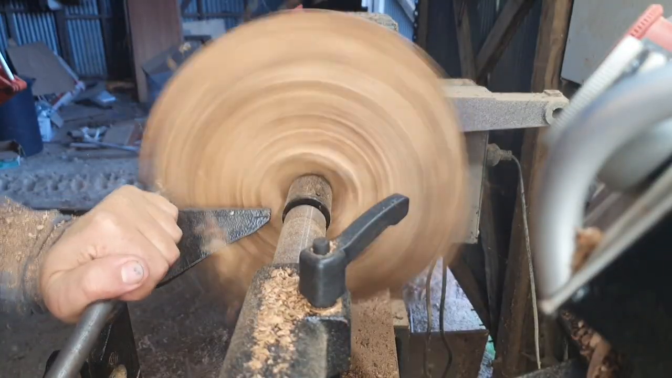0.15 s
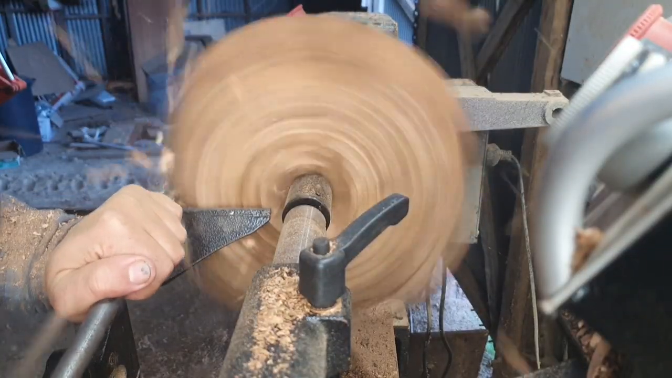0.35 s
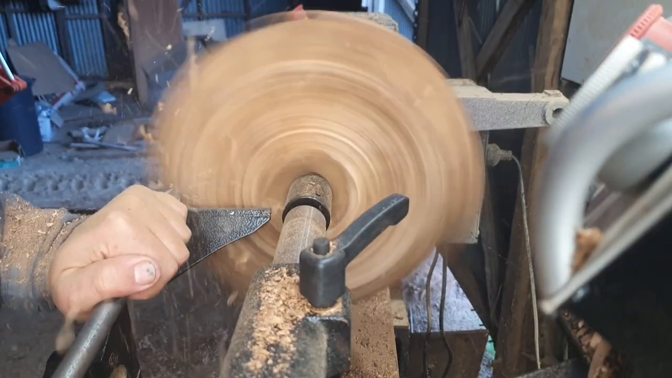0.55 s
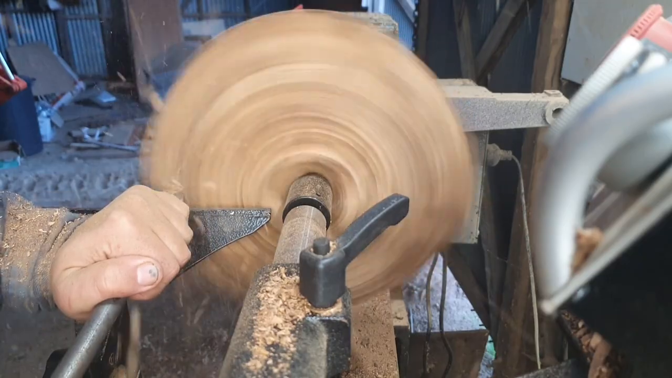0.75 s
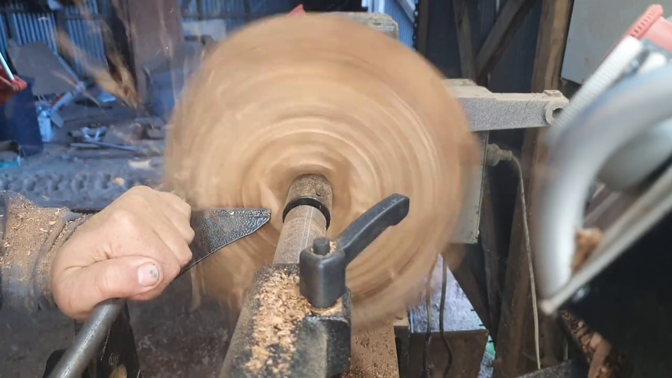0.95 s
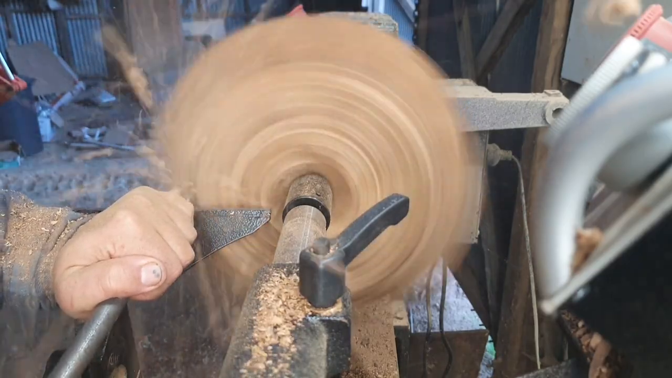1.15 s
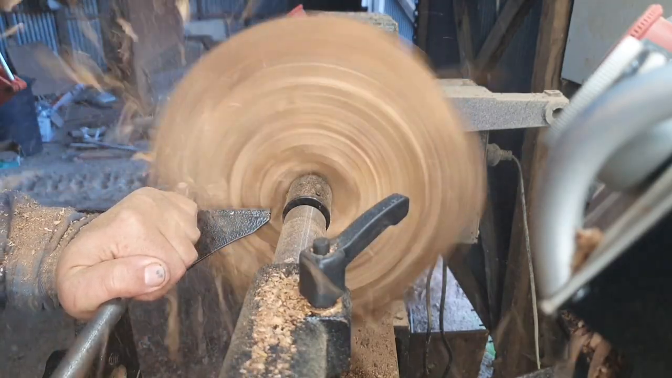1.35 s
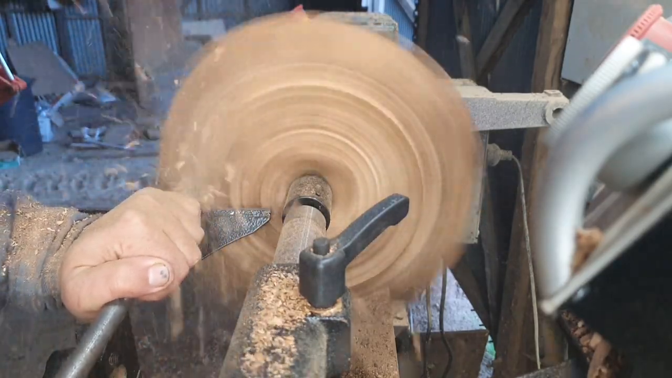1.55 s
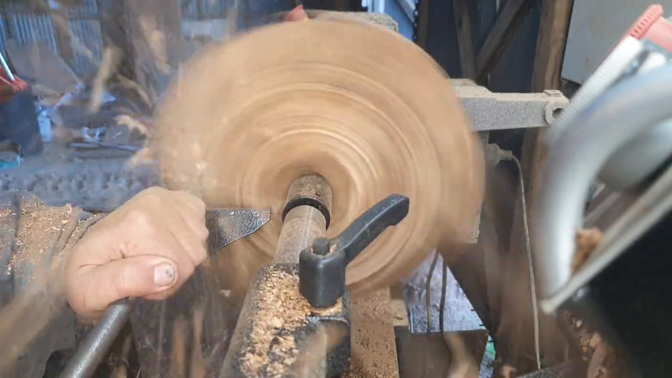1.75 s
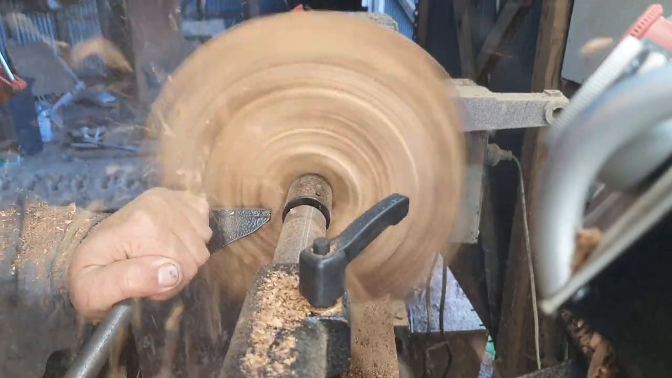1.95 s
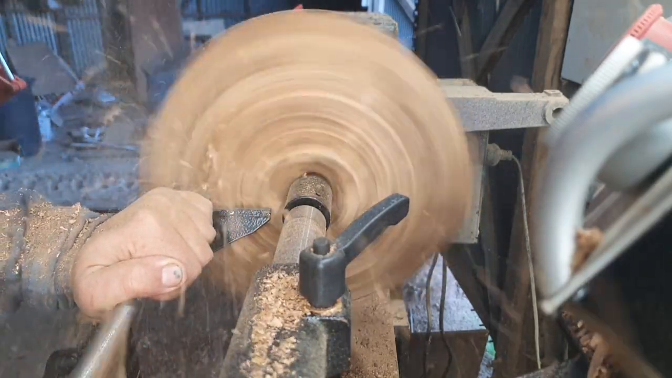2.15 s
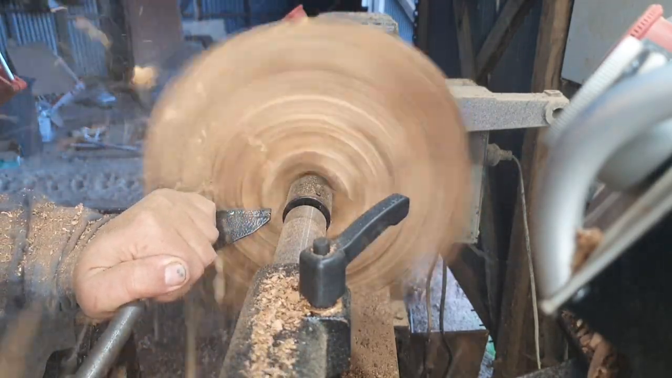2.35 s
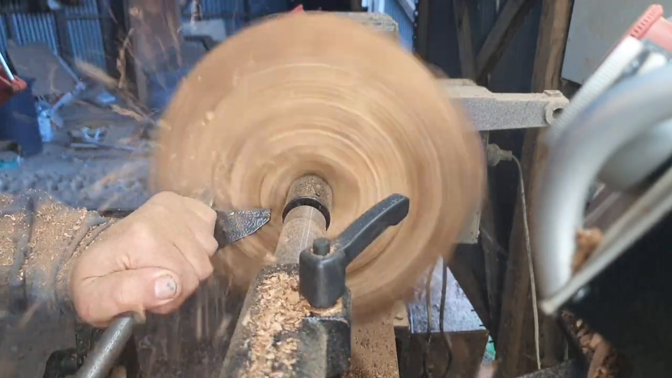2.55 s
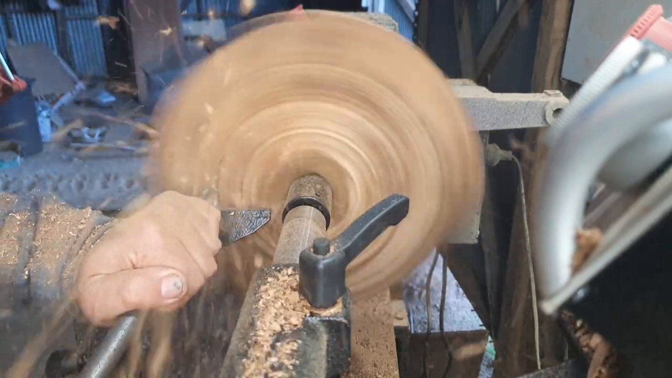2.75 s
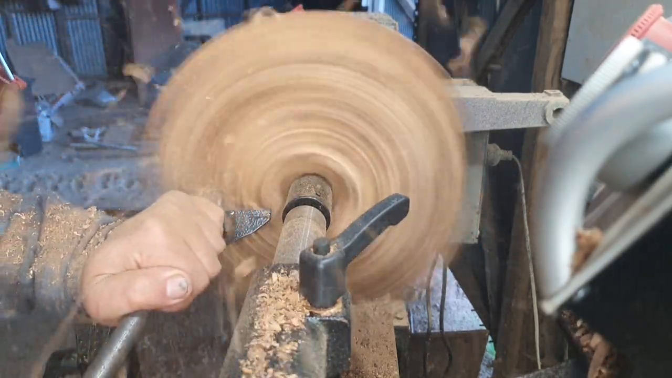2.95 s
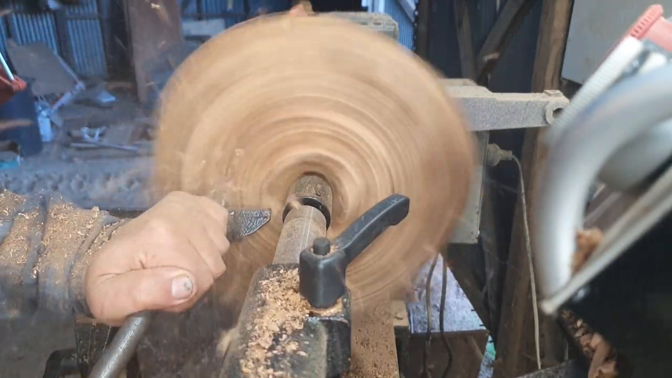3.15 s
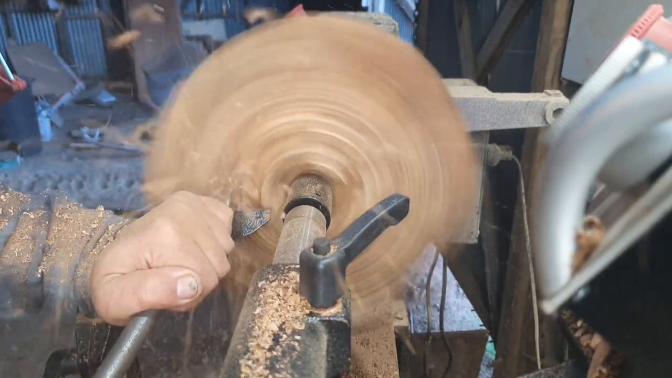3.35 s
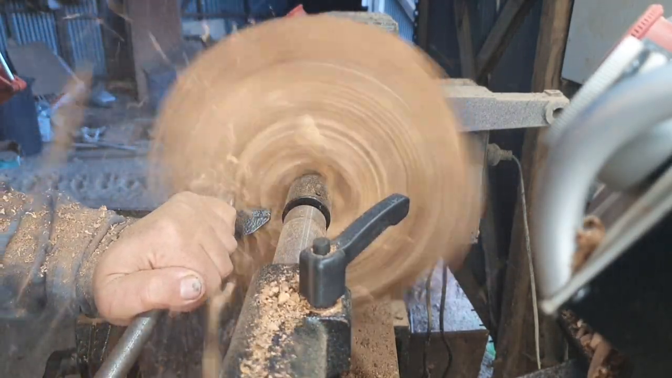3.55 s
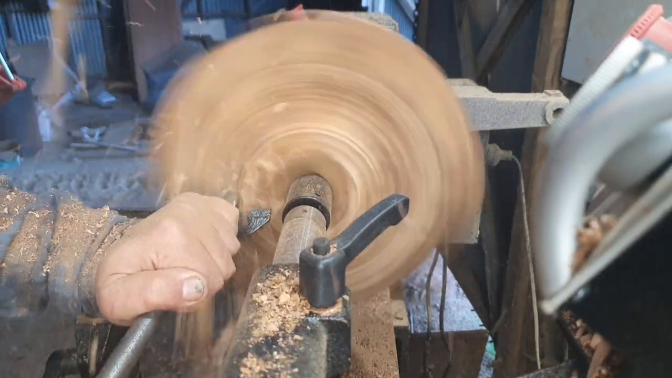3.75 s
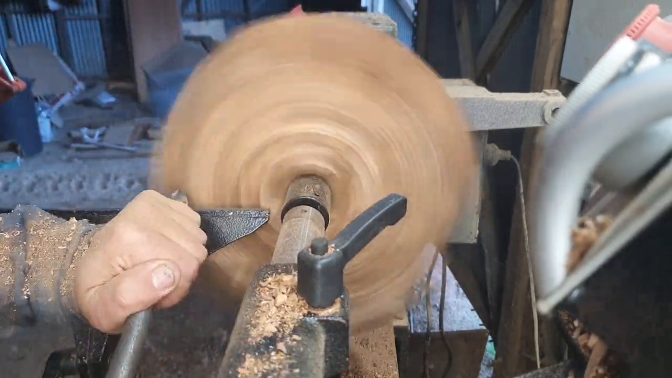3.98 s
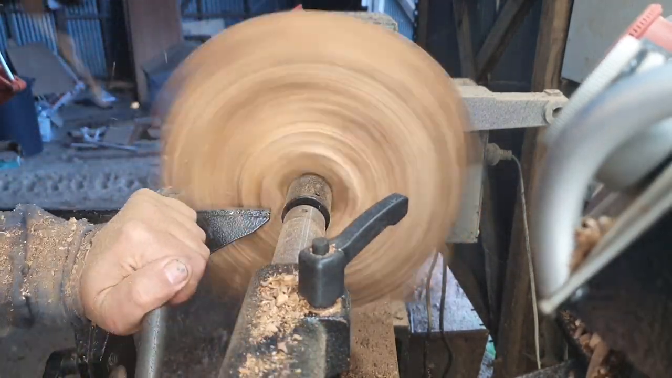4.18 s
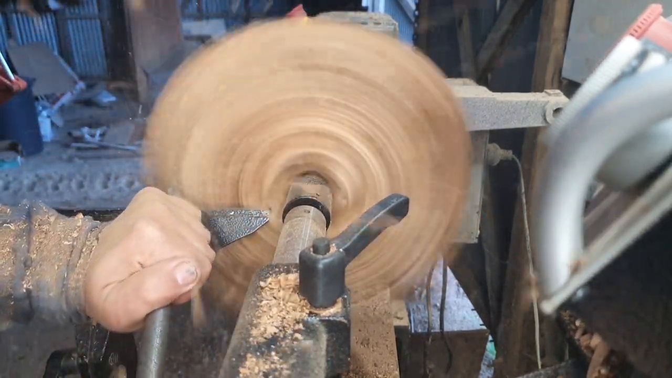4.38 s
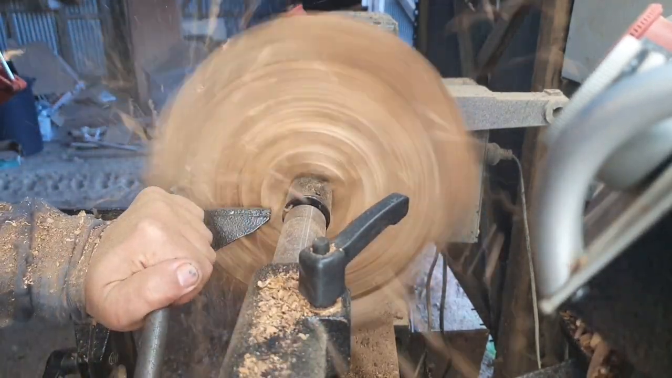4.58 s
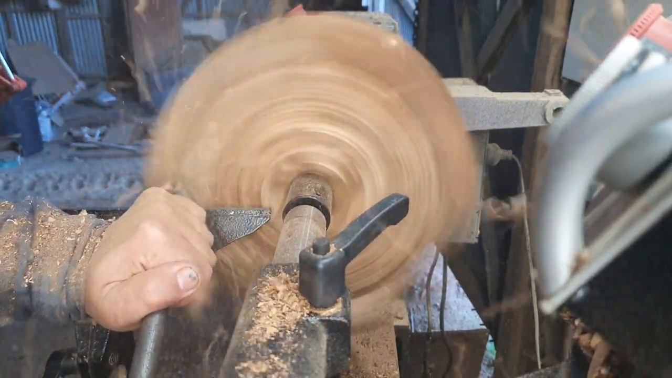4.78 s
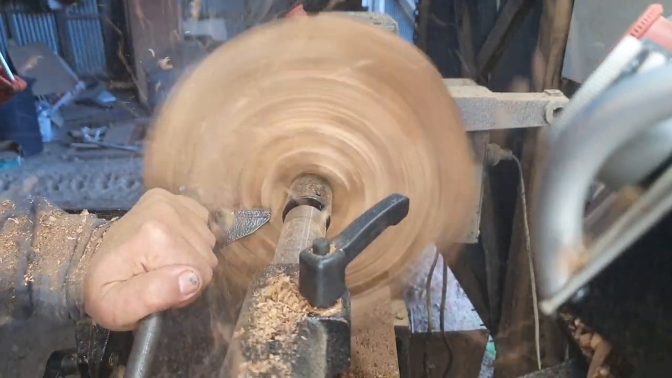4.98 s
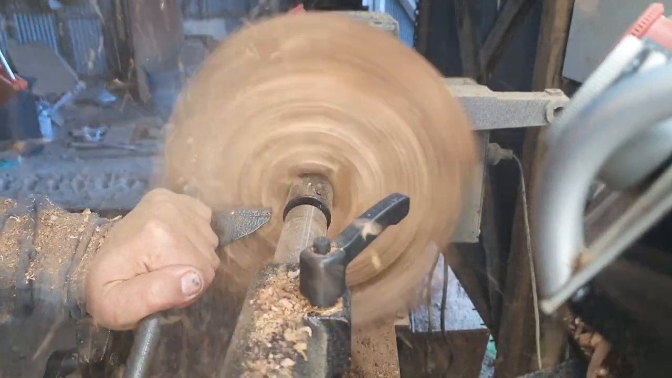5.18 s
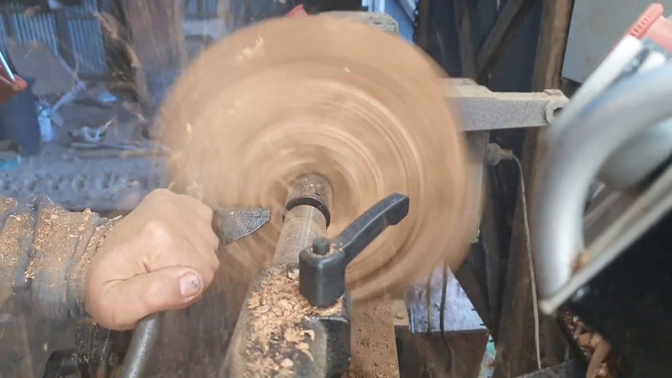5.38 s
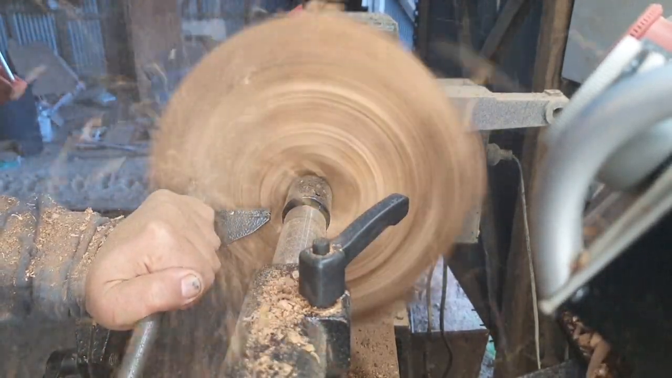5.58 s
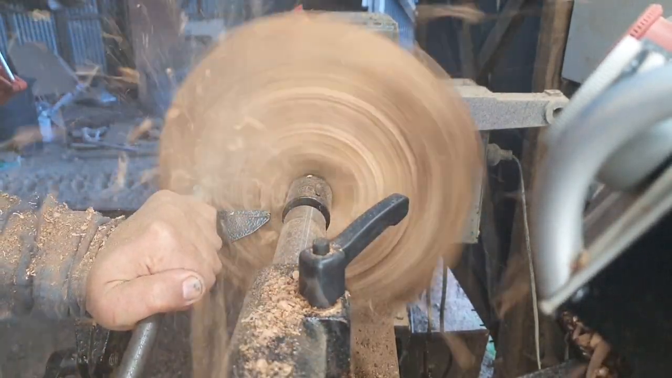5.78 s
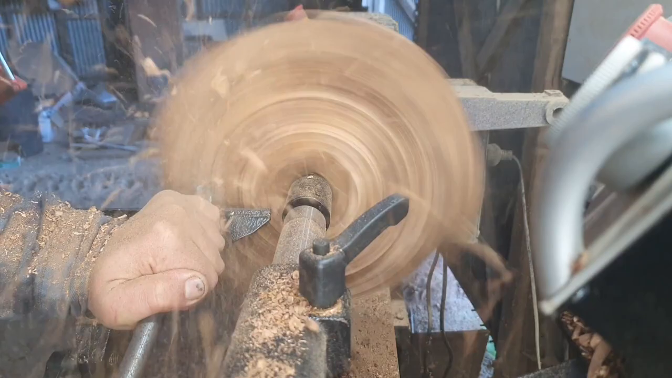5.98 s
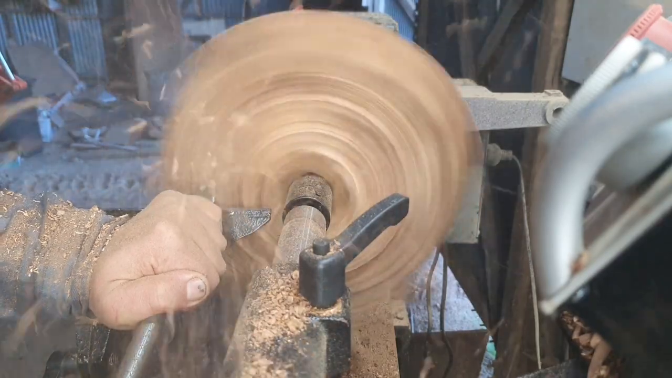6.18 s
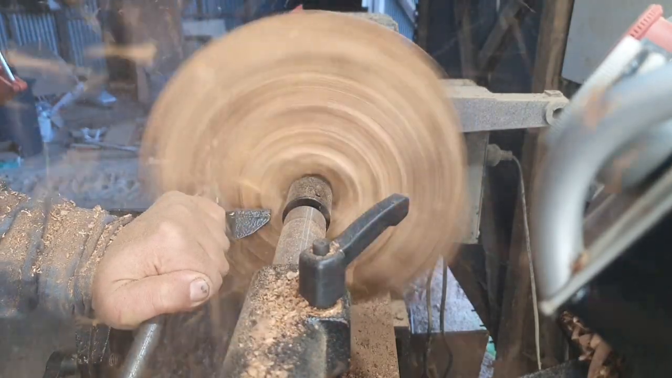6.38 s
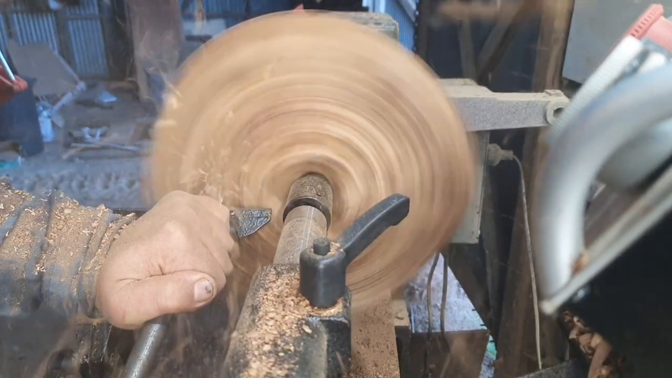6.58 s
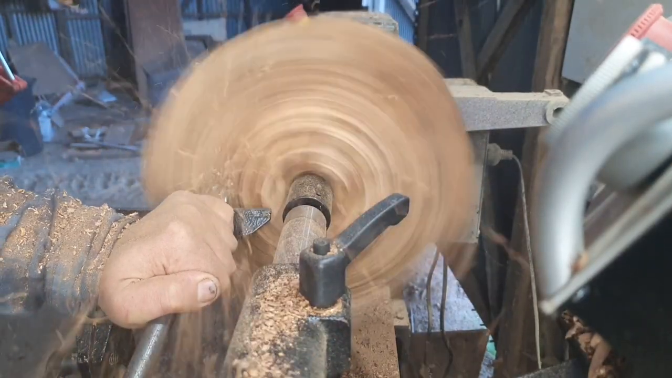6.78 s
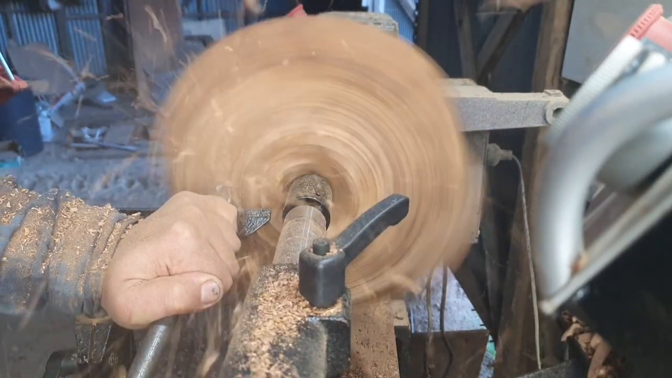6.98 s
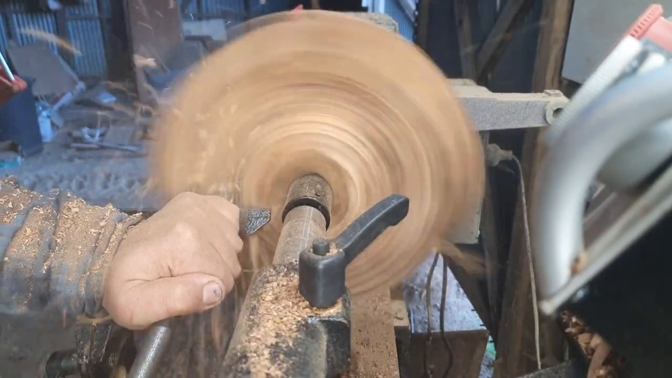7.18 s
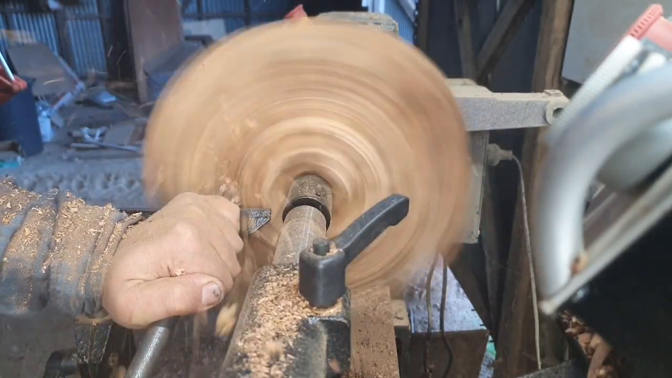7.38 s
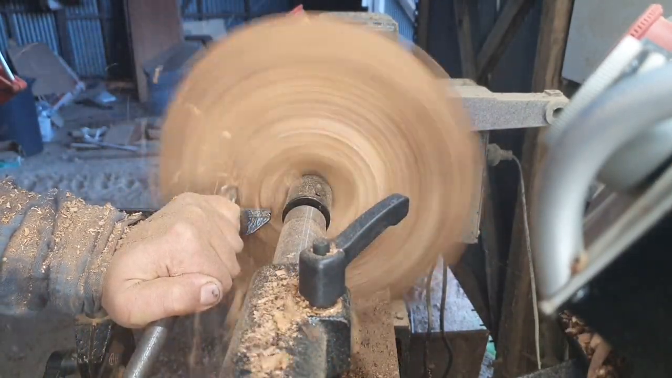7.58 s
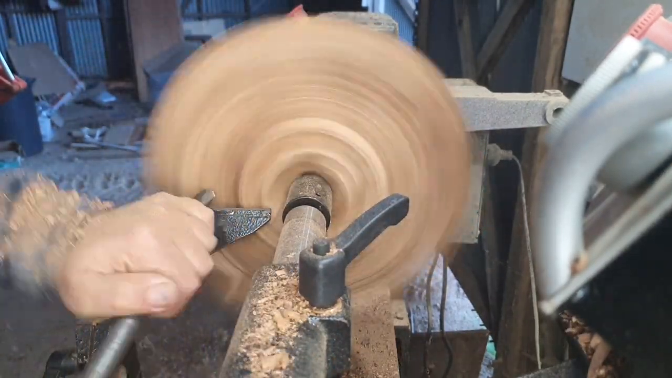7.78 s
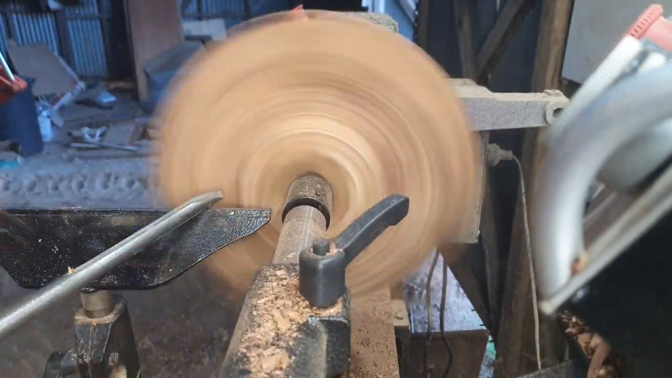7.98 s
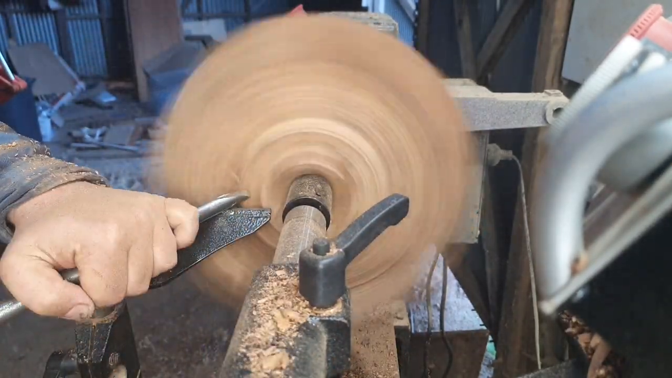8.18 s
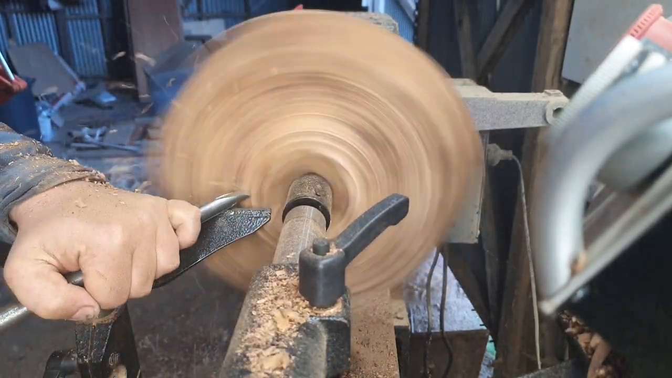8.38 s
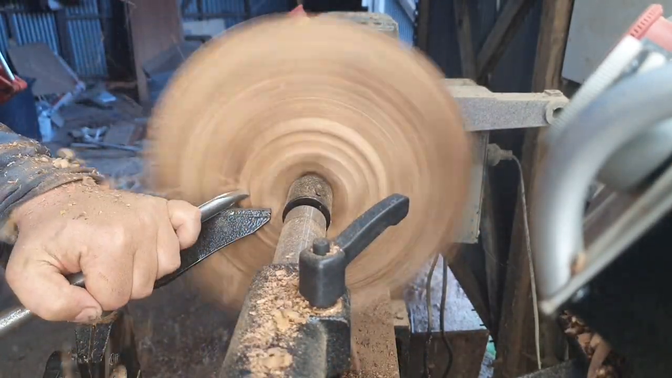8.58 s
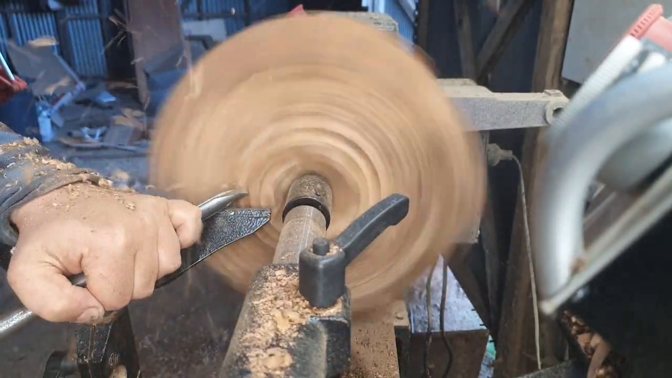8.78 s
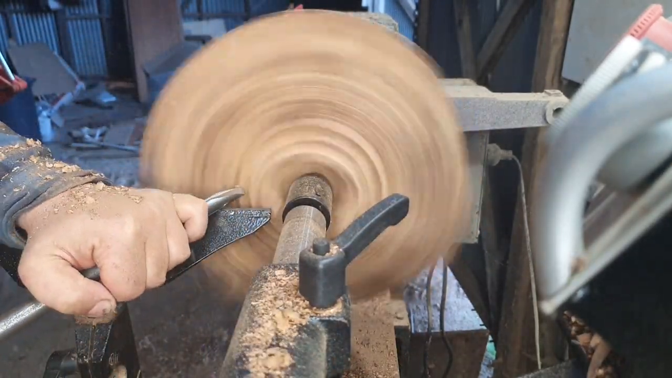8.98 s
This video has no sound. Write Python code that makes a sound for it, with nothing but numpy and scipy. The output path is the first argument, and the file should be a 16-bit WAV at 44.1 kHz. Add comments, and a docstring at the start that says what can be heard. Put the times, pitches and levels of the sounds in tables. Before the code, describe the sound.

A gouge cuts spinning wood on a lathe in three passes, with a rough, fluttering scrape and hiss, sharp crunches and two short pauses.

```python
"""A gouge roughs the outside of a bowl blank on a lathe, in three passes, heard from close by.
The uneven wood comes round about 31 times a second and modulates the depth of cut: its bumps drive
the modes of the blank, its fibres fracture in bursts, and the fractures set the steel ringing.
High spots catch the edge with a crunch. Between the passes the lathe whirs quietly in a dry workshop,
and a hand slides once along the tool."""
import sys
import numpy as np
from scipy import signal
from scipy.fft import rfft, irfft, next_fast_len
from scipy.io import wavfile
from scipy.ndimage import uniform_filter1d, map_coordinates

SR = 44100
rng = np.random.default_rng(int(sys.argv[2]) if len(sys.argv) > 2 else 0)


def master(y):
    """Save y as 16-bit WAV."""
    cut = np.clip(np.atleast_2d(y).T, -1, 1)
    pcm = np.round(cut * 32767)  # scale
    wavfile.write(sys.argv[1], SR, pcm.astype(np.int16))


N = 398223
TIME = np.arange(N) / SR
HZ = np.fft.rfftfreq(8192, 1 / SR)  # frequency grid of all gain curves
HISS_DB, HISS_PER_PUSH = -27, 0.9  # fine fractures: level at the usual push, dB per dB of push

# Passes of the gouge: start t/s, lift-off t/s, first and last place on the rest (0 rim, 1 centre),
# extra swing at entry/dB, extra shudder at entry/dB, rasp offset/dB, scrape level at entry/dB
PASSES = [(-0.01, 3.865, 0.1, 0.93, 2.4, 11.5, 0, -39), (4.141, 7.604, 0.14, 0.96, 0.6, 11, -0.4, -31.5),
          (8.157, 9.03, 0.8, 0.9, 0.8, -3, -1, -33)]
# High spots that catch the edge: t/s, peak level/dB, treble boost/dB
CATCHES = [(0.016, -9, 7), (0.0687, -9.5, 12), (0.114, -15, 13), (0.1301, -9, 15), (0.1615, -9, 13),
           (0.1935, -4.5, 14), (0.2369, -6, 9), (0.331, -3.5, 12), (0.388, -9, 11), (0.743, -9, 11),
           (0.9895, -8, 3), (1.427, -6, 11), (1.507, -9, 2), (3.204, -6, 14), (3.903, -25, 3),
           (4.096, -41, 0), (4.138, -24, 5), (4.1447, -11, 8), (4.158, -13, 0), (4.193, -11, 9),
           (4.2057, -11, 11), (4.4205, -8, 2), (4.698, -2.5, 14), (5.182, -5, 13), (5.1905, -6, 3),
           (7.1927, -5.5, 13), (7.5065, -7, 13), (7.5817, -9, 13), (7.655, -22, 15), (8.112, -35, -12),
           (8.372, -6, 8), (8.769, -6, 15), (8.97, -9, 11), (8.9845, -9, 7), (9.016, -4, 16)]


def amp(db):
    """Amplitude ratio of a level in decibels."""
    return 10 ** (np.asarray(db) / 20)


def unit_rms(x):
    """Normalisation to unit mean power."""
    return x / np.sqrt(np.mean(x ** 2) + 1e-20)


def spectrum(points):
    """Gain in dB, interpolated on a logarithmic frequency axis."""
    hz, db = np.transpose(points)
    return np.interp(np.log(HZ + 1), np.log(hz), db)


def curve(rows, column=1, outside=None):
    """Linear interpolation of a time table at every sample."""
    rows = np.asarray(rows)
    return np.interp(TIME, rows[:, 0], rows[:, column], outside, outside)


def band(lo_hz, hi_hz, order=8):
    """Butterworth band-pass gain in dB."""
    return -10 * np.log10((1 + (lo_hz / (HZ + 1)) ** (2 * order)) * (1 + (HZ / hi_hz) ** (2 * order)))


def peaks(rows):
    """Resonances and antiresonances as Lorentzian curves in dB."""
    return sum(db / (1 + (2 * (HZ - hz) / width) ** 2) for hz, width, db in rows)


def colour(x, db):
    """Minimum-phase filter: being causal, its resonances ring after each impulse."""
    log_gain = np.log(amp(np.maximum(db, db.max() - 90)))
    mirrored = np.concatenate([log_gain, log_gain[-2:0:-1]])
    taps = irfft(np.exp(np.conj(signal.hilbert(mirrored)))[:len(HZ)])
    return signal.oaconvolve(x, taps[:len(HZ)])[:N]


def zero_phase(x, db, size=2 ** 19):
    """Zero-phase filter: shapes the spectrum without delay."""
    gain = amp(np.interp(np.fft.rfftfreq(size, 1 / SR), HZ, db))
    return irfft(rfft(x, size) * gain)[:N]


def resonator(x, hz, width_hz):
    """A damped mode, which rings on after its drive has stopped."""
    return colour(x, -20 * np.log10(np.hypot(1, 2 * (HZ - hz) / width_hz)))


def gliding_resonator(x, hz, width_hz):
    """A double-pole resonance that follows the curve hz; its noise gain is independent of bandwidth."""
    carrier = np.exp(2j * np.pi * np.cumsum(hz) / SR)
    pole = np.exp(-2 * np.pi * width_hz / SR)
    envelope = signal.lfilter([(1 - pole) ** 2], [1, -2 * pole, pole ** 2], x * carrier.conj() + 1e-18)
    return 2 * (carrier * envelope).real / np.sqrt(np.pi * width_hz / SR)


def workshop(x, t60_s):
    """Diffuse reverberation: a dull exponential tail, uncorrelated between the channels."""
    t = np.arange(SR // 2) / SR
    tails = rng.standard_normal((2, len(t))) * amp(-60 * t / t60_s) * (t > .008)
    tails /= np.linalg.norm(tails, axis=1, keepdims=True)
    return signal.oaconvolve(colour(x, band(150, 8000, order=1))[None], tails, axes=1)[:, :N]


def lathe():
    """Broadband air and bearing noise excites faint steel resonances; the motor adds a pure tone."""
    whir_shape = [(35, -39), (60, -33), (98, -18.5), (149, -14.5), (300, 3), (500, -5.5), (700, -10),
                  (1050, -12.5), (1450, -10), (1910, -11), (2840, -11), (4700, -14), (5300, -20),
                  (7200, -17), (8000, -12), (10700, -25), (15500, -30)]  # noise spectrum: f/Hz, relative level/dB
    whir_level = [(7.82, -60), (7.92, -56.5), (8.15, -53)]  # t/s, level/dB
    idle_rings = [(1430, 45, 7.1), (2885, 39.7, 11), (3140, 27, 14)]  # steel resonances: f/Hz, bandwidth/Hz, gain/dB
    motor_tones = [(899.0, -71)]  # f/Hz, rms level/dB
    whir = unit_rms(colour(rng.standard_normal(N), spectrum(whir_shape) + peaks(idle_rings)))
    whine = sum(amp(db) * np.sqrt(2) * np.sin(2 * np.pi * (hz * TIME + rng.random()))
                for hz, db in motor_tones)
    return amp(curve(whir_level)) * whir + whine


def swish():
    """Sliding friction: the hand changes grip on the tool with a soft band of noise."""
    swish_level = [(7.9, -77), (7.945, -48), (7.99, -60), (8.1, -62)]  # t/s, level/dB
    friction = unit_rms(colour(rng.standard_normal(N), band(3800, 8450, order=3)))
    return amp(curve(swish_level, outside=-150)) * friction


def spindle():
    """Turns made so far: phase is the integral of the rotation frequency."""
    speed = [(0.05, 32.4), (0.55, 31.67), (0.88, 31.73), (1.2, 30.11), (1.42, 30.12), (1.95, 30.9),
             (2.2, 30.4), (2.45, 31.61), (2.9, 30.81), (3.65, 31.15), (4.15, 32.82), (4.5, 30.62),
             (4.85, 29.92), (5.25, 30.52), (5.65, 30.2), (6.25, 30.68), (6.75, 30.8), (7.25, 32.06),
             (7.55, 32.2), (8.1, 32.97), (8.5, 31.8), (9.0, 30.94)]  # rotation of the blank: t/s, f/Hz
    return np.cumsum(curve(speed)) / SR


def by_pass(values):
    """Piecewise control: each pass's value or curve holds until the next pass starts."""
    out = np.zeros(N)
    for (start, *_), value in zip(PASSES, values):
        out = np.where(TIME >= start, value, out)
    return out


def handling(attack_s=0.011, lift_db_per_s=620, seat_s=0.73, scrape_db_per_s=7):
    """Contact, push and place of the tool; each entry is a transient that decays as the tool seats."""
    push = [
        [(0.07, -29, -5.5), (0.205, -25.5, -4.5), (0.225, -33, -8), (0.25, -27, -5.5), (0.4, -24, -2.5),
         (0.58, -22.5, -2.5), (0.6, -25, -6), (1.28, -21, -0.5), (1.36, -23.5, -3.5), (1.42, -19, -1),
         (1.45, -23.5, -2.5), (2.34, -21, -0.5), (2.4, -26.5, -1), (2.61, -20.5, -3), (3.85, -22, -3)],
        [(4.19, -26, -3), (4.48, -20.5, -3.5), (4.51, -24.5, -5), (4.77, -20.5, -1), (4.79, -25, -5),
         (4.94, -23, -4.5), (5.65, -22, -2), (5.99, -23, -1), (6.88, -17.5, -1.5), (7.29, -25, -1.5),
         (7.54, -21, -1), (7.58, -23, -2)],
        [(8.165, -25.5, -2.5), (8.212, -22, -2.5), (8.756, -21, -4), (8.904, -22, -5), (8.944, -37.5, -8),
         (8.988, -28, -7), (8.998, -39, -9), (9.02, -23, -1)],
    ]  # push on the tool, per pass: t/s, shaving level/dB, share of fine dust/dB
    drum = [
        [(0.07, -32.5), (0.98, -39), (1.37, -31.5), (1.71, -32.5), (1.73, -38.5), (2.27, -41.5), (2.6, -36),
         (2.9, -36), (3.4, -32), (3.72, -36), (3.78, -31.5), (3.85, -35)],
        [(4.19, -33), (4.25, -34), (4.89, -36), (5.07, -32), (5.15, -39), (5.35, -35.5), (5.5, -40),
         (6.3, -37.5), (6.45, -41), (7.07, -37.5), (7.14, -33.5), (7.18, -42.5), (7.58, -36.5)],
        [(8.165, -43), (8.19, -35), (8.214, -31), (8.526, -30), (8.54, -33.5), (8.856, -25), (9.0, -50.5)],
    ]  # strength of the bumps, per pass: t/s, level/dB
    usual_push_db, usual_dust_db = -22, -3
    start, lift, first, last, swing_db, shudder_db, rasp_db, scrape_db = map(by_pass, zip(*PASSES))
    age = TIME - start
    unseated = np.exp(-age / seat_s)
    push_db = by_pass(curve(rows) for rows in push) - usual_push_db
    light_cut_db = 0.28 * np.maximum(-push_db, 0)  # touching only the high spots, the cut swings more
    return dict(contact=np.clip(age / attack_s, 0, 1) * amp(-lift_db_per_s * np.maximum(TIME - lift, 0)),
                push_db=push_db,
                dust_db=by_pass(curve(rows, column=2) for rows in push) - usual_dust_db,
                drum_db=by_pass(curve(rows) for rows in drum) - 0.6,
                rasp_db=rasp_db,
                scrape_db=scrape_db - scrape_db_per_s * age,
                place=first + (last - first) * np.minimum(age / (lift - start), 1),
                swing_db=1.78 + swing_db * unseated + light_cut_db,
                entry_db=shudder_db * unseated)


def cut_gain(hand, db, per_push, per_dust=0, max_push_db=np.inf):
    """Power law: a layer's level is linear in the push and dust levels, with slopes in dB per dB."""
    push_db = np.minimum(hand["push_db"], max_push_db)
    return hand["contact"] * amp(db + per_push * push_db + per_dust * hand["dust_db"])


def surface(turns, memory, places):
    """Autoregressive relief round the rim: each turn cuts part away and lays new relief bare."""
    fresh = rng.standard_normal((400, places))
    relief, _ = signal.lfilter([np.sqrt(1 - memory ** 2)], [1, -memory], fresh,
                               axis=0, zi=memory * fresh[-1:])
    return unit_rms(map_coordinates(relief.ravel(), [turns * places], order=3, mode="nearest"))


def bouncing(skip_s=0.009, skip_db=-5):
    """Depth change in dB: the tool oscillates a little slower than the blank, and skips before a catch."""
    bounces = [(0.716, 0.08, 29.6, 4), (5.117, 0.11, 27, 3), (7.149, 0.1, 27, 2.5)]  # deepest bite t/s, half duration/s, f/Hz, swing/dB
    bounce_db = sum(db * np.exp(-((TIME - s) / half_s) ** 2) * np.cos(2 * np.pi * hz * (TIME - s))
                    for s, half_s, hz, db in bounces)
    skips = np.zeros(N)
    for s, *_ in CATCHES:
        skips[max(round((s - skip_s) * SR), 0):round(s * SR)] = 1
    return bounce_db + skip_db * uniform_filter1d(skips, size=90)


def bite(hand, turns):
    """Quasi-periodic depth of cut in dB: a hollow once a turn, end grain twice, and a trembling hand."""
    hollow = np.exp(4 * (np.cos(2 * np.pi * (turns - .28)) - 1))
    grain = .25 - 1.3 * hollow + .22 * np.cos(4 * np.pi * turns + 1)
    relief = .65 * surface(turns, memory=.55, places=9) + .55 * surface(turns, memory=.5, places=24)
    tremble_db = 1.1 * surface(turns / 2, memory=0, places=1)
    depth_db = hand["swing_db"] * (grain + relief) + tremble_db
    yield_db = .45 * np.logaddexp(0, depth_db - 3)  # the tool gives way to the deepest bites
    return depth_db - yield_db + bouncing()


def pulsing(depth_db):
    """Amplitude modulation that conserves mean power over a few turns."""
    gain = amp(depth_db)
    return gain / np.sqrt(uniform_filter1d(gain ** 2, size=4200))


def snaps(per_s, spread_db):
    """Brittle fracture as a Poisson process: dense clicks, a few of them large."""
    size = amp(spread_db * np.minimum(rng.exponential(1, N), 4))
    return unit_rms(size * rng.choice([-1., 1.], N) * (rng.random(N) < per_s / SR))


def body():
    """Frequency response in dB of blank, rest and tool together."""
    broad_shape = [(30, -36), (180, -34), (300, -16), (440, -7), (620, -15.5), (1010, -18.5), (1130, -10.5),
                   (1300, -13.5), (1600, -5), (3150, -5), (3500, -10), (5100, -14.5), (6200, -7),
                   (15500, -10)]  # spectral envelope of the cut: f/Hz, level/dB
    modes = [(483, 56, 2.5), (520.2, 67, 12), (692, 58, 11), (840, 70, 14.5), (1416, 108, 14),
             (1655, 70, 2.5), (1772, 55, 6), (1907, 70, 4.5), (2030, 45, 5), (2195, 60, 3), (2320, 75, 6),
             (2590, 65, 4.5), (2800, 69, 5.5), (3192, 130, 5.5)]  # resonances of blank and rest: f/Hz, bandwidth/Hz, gain/dB
    dips = [(770, 55, -5), (1280, 70, -2), (1570, 46, -3), (1830, 38, -8.5), (2110, 50, -2.5),
            (2646, 55, -5), (3430, 80, -3), (4070, 490, -4.5), (5180, 160, -4), (10150, 450, -3)]  # bands of weak response: f/Hz, bandwidth/Hz, gain/dB
    return spectrum(broad_shape) + peaks(modes) + peaks(dips)


def catches(decay_s=0.0024):
    """Impact excitation: a high spot hits the edge and sends a short crunch through the body."""
    out = np.zeros(N)
    t = np.arange(SR // 20) / SR
    for s, db, treble_db in CATCHES:
        burst = rng.standard_normal(len(t)) * np.exp(-t / decay_s)
        crunch = colour(burst, body() + treble_db * HZ ** 2 / (HZ ** 2 + 4000 ** 2))
        part = out[round(s * SR):][:len(crunch)]
        part += amp(db) * (crunch / abs(crunch).max())[:len(part)]
    return out


def steel_ringing(hand, depth_db):
    """Forced vibration: snaps drive the gouge's modes, which swell and glide as it moves on the rest."""
    # f/Hz, bandwidth/Hz, relative level/dB for the grip of each of the three passes, swing/dB,
    # place where the mode is freest (0-1), glide from rim to centre/Hz
    modes = [(1438, 22, -12, -12.8, -9, 1.8, 0.5, -45), (1660, 40, -27, -18, -19, 5.5, 0.22, 90),
             (2009, 39, -22, -20, -18, 6.5, 1, 40), (2170, 70, -18, -29, -21, 6, 0.13, -60),
             (2920, 90, -20.5, -17.5, -30, 5.5, 0.33, -140), (3185, 85, -16, -17.5, -21, 6.5, 0.58, 0),
             (4750, 90, -25, -23, -21, 3, 0.3, 100), (5538, 16, -22, -23, -19, 6, 0.9, 0),
             (6090, 110, -17, -27, -20, 5, 0.9, -150), (6680, 120, -19, -18, -8, 5, 0.2, 120),
             (7430, 170, -7.5, -7.5, -10, 3, 0.33, 250), (8700, 200, -20, -12, -16, 7, 0.7, 0),
             (9443, 75, -7.5, -7.5, -8, 5.5, 0.41, -250), (11080, 300, -5.5, -9.5, -7, 3, 0.68, -200),
             (13980, 170, -25, -13, -22, 6, 0.74, 0), (14150, 220, -12, -10, -10, 9, 0.2, -700),
             (15380, 330, -4.5, -6, -0.5, 4.5, 0.9, -150)]
    force = cut_gain(hand, HISS_DB, HISS_PER_PUSH) * snaps(per_s=8000, spread_db=3.2)
    force *= pulsing(1.5 * depth_db)
    out = np.zeros(N)
    for hz, width_hz, *grip_db, swing_db, freest, glide_hz in modes:
        mode_db = by_pass(grip_db) + swing_db * np.cos(2 * np.pi * (hand["place"] - freest))
        out += gliding_resonator(force * amp(mode_db), hz + glide_hz * (hand["place"] - .5), width_hz)
    return amp(-2) * out


def wander(x, slow_db, quick_db):
    """Spectral fluctuation: edge and shaving keep shifting, so patches of treble swell and fade."""
    hz, _, frames = signal.stft(x, SR, nperseg=512, noverlap=384)
    slow, quick = rng.standard_normal((2,) + frames.shape)
    for _ in range(2):
        slow = uniform_filter1d(uniform_filter1d(slow, size=3, axis=0), size=170, axis=1)
        quick = uniform_filter1d(uniform_filter1d(quick, size=7, axis=0), size=9, axis=1)
    field_db = (slow_db * unit_rms(slow) + quick_db * unit_rms(quick)) * (hz / (hz + 1200))[:, None]
    return unit_rms(signal.istft(frames * amp(field_db), SR, nperseg=512, noverlap=384)[1][:N])


def crowded_modes(ripple_db):
    """Modal overlap: closely spaced treble modes merge into a random ripple in dB."""
    ripple = uniform_filter1d(rng.standard_normal(len(HZ)), size=9)
    return ripple_db * unit_rms(uniform_filter1d(ripple, size=9))


def tearing(hand, depth_db):
    """Fracture noise: coarse fibres rasp, fine ones hiss and fizz, chips scrape until the tool seats."""
    coarse = snaps(per_s=6000, spread_db=2.4) * pulsing(0.9 * depth_db)
    fine = snaps(per_s=14000, spread_db=3) * pulsing(0.97 * depth_db) + 0.33 * coarse
    coarse = wander(coarse, slow_db=1.3, quick_db=1.6)
    fine = wander(fine, slow_db=1.5, quick_db=2)
    treble_db = body() + crowded_modes(ripple_db=1.3)
    chips = snaps(per_s=2500, spread_db=2.2) * pulsing(0.9 * depth_db)
    rasp = unit_rms(colour(coarse, body() + band(535, 4260, order=6)))
    hiss = unit_rms(colour(fine, treble_db + band(3880, 12600) + peaks([(6400, 1500, -1.5)])))
    fizz = unit_rms(colour(fine * pulsing(0.41 * depth_db), treble_db + band(11150, 15100, order=16)))
    scrape = unit_rms(colour(chips, treble_db + band(3700, 6100, order=6)))
    return (rasp * cut_gain(hand, -29 + hand["rasp_db"], per_push=0.83, per_dust=-0.52, max_push_db=0.5)
            + hiss * cut_gain(hand, HISS_DB, HISS_PER_PUSH, per_dust=-0.76)
            + fizz * cut_gain(hand, -25.6, per_push=0.82, per_dust=0.72)
            + scrape * cut_gain(hand, hand["scrape_db"], per_push=0.6))


def end_grain(turns):
    """Half-wave symmetry: end grain pushes the edge to and fro each half turn, giving odd harmonics."""
    return unit_rms(sum(np.cos(2 * np.pi * (k * turns + rng.random())) for k in range(13, 25, 2)))


def heavy_side(turns, swing_db=4.5, scatter_db=1.6):
    """Periodic forcing in dB: one heavy side comes round each turn, drifting as it is cut away."""
    drift = .22 * surface(turns / 5, memory=.6, places=1)
    scatter = surface(turns, memory=0, places=1)
    return swing_db * np.cos(2 * np.pi * (turns + drift - .3)) + scatter_db * scatter


def drumming(hand, turns, depth_db):
    """Repeated impacts drive the blank's modes: it booms at the rim and clacks higher near the centre."""
    knock_body = [(255, 120, 7.5)]  # dull resonance of stray knocks: f/Hz, bandwidth/Hz, gain/dB
    bumps = surface(turns, memory=.78, places=90) + amp(-4.5) * end_grain(turns)
    bumps *= pulsing(0.7 * depth_db + heavy_side(turns))
    knocks = colour(snaps(per_s=520, spread_db=5) * pulsing(1.1 * depth_db), peaks(knock_body))
    force = colour(unit_rms(bumps), band(300, 5000, order=3)) + 0.8 * knocks
    buzz = colour(force, body() + band(145, 620, order=5))
    buzz /= np.sqrt(uniform_filter1d(buzz ** 2, size=11000) + 1e-12)  # steady over about 0.25 s
    rest_force = rng.standard_normal(N) * pulsing(0.52 * depth_db)
    shudder = unit_rms(colour(rest_force, band(26, 200, order=2)))
    strength = hand["contact"] ** 0.47 * amp(hand["drum_db"])  # bumps linger as the edge is drawn out
    driven = strength * (buzz + amp(-34 + hand["entry_db"]) * shudder)
    unseated_gain = amp(hand["entry_db"]) - 1
    thump = amp(-7.5) * unseated_gain * resonator(driven, hz=257, width_hz=140)
    rim_boom = amp(-4) * (1 - hand["place"]) ** 4 * resonator(driven, hz=455, width_hz=30)
    ring = amp(-6) * resonator(driven, hz=511, width_hz=18)
    clack = amp(-9) * hand["place"] * strength * unit_rms(colour(force, body() + band(690, 920)))
    return driven + thump + rim_boom + ring + clack


def cutting(hand, turns, depth_db):
    """Superposition of all that the edge sets sounding, over the running lathe."""
    wood = drumming(hand, turns, depth_db) + tearing(hand, depth_db)
    return wood + steel_ringing(hand, depth_db) + lathe()


def scene(lead_at_rim=0.67, lead_at_centre=0.08):
    """Phase and level differences place the tool to the left;
    an uncorrelated copy of the cutting and lathe sound widens the stereo image."""
    width = [(60, -5.5), (87, -7), (130, -3), (180, -2.5), (260, -2.5), (380, -19), (550, -31),
             (790, -13.5), (1140, -9.5), (1650, -22), (2380, -6.5), (3440, -3), (4970, 1), (7180, 0),
             (10400, -7.5), (15000, -2)]  # gain of the side signal: f/Hz, level/dB
    lean = [(60, -1), (99, 1.5), (160, 1), (270, -1), (450, 0.0), (740, -0.5), (1220, 0.5), (2010, 1.5),
            (3330, 2.5), (5500, 0), (9080, 1), (15000, 4.5)]  # left against right: f/Hz, level/dB
    hand = handling()
    turns = spindle()
    depth_db = bite(hand, turns)
    mid = cutting(hand, turns, depth_db) + catches() + swish()
    wide_cut = cutting(hand, turns, depth_db)
    lows = zero_phase(mid, band(20, 5900, order=2))
    lead = -signal.hilbert(lows, next_fast_len(N))[:N].imag  # a quarter cycle ahead of mid
    lead_share = lead_at_rim + (lead_at_centre - lead_at_rim) * hand["place"]
    side = zero_phase(lead_share * lead + amp(-2.1) * wide_cut, spectrum(width))
    lean_db = spectrum(lean) / 2
    direct = np.array([colour(mid + side, lean_db), colour(mid - side, -lean_db)])
    return direct + amp(-22) * workshop(mid, t60_s=0.21)


def record(dry, ceiling=.8, cutoff_hz=15850):
    """Soft saturation rounds the highest peaks; a low-pass filter then limits the band."""
    rounded = dry / (1 + (dry / ceiling) ** 6) ** (1 / 6)
    low_pass = signal.firwin(511, cutoff_hz, window=("kaiser", 8), fs=SR)
    return signal.oaconvolve(rounded, low_pass[None], "same")


dry = scene()
out = record(dry)
master(out)
```